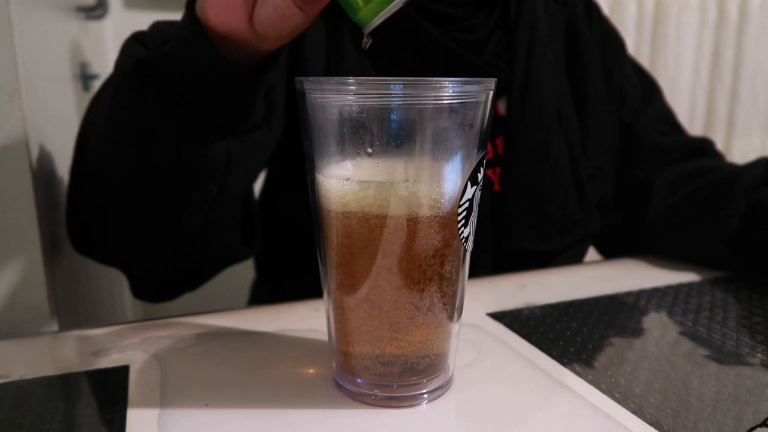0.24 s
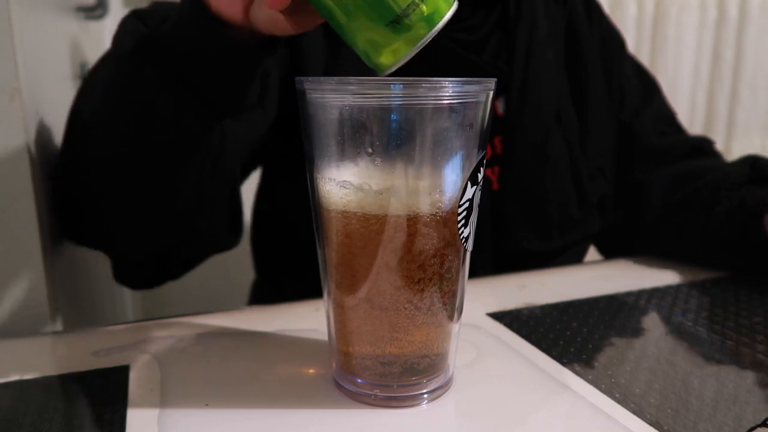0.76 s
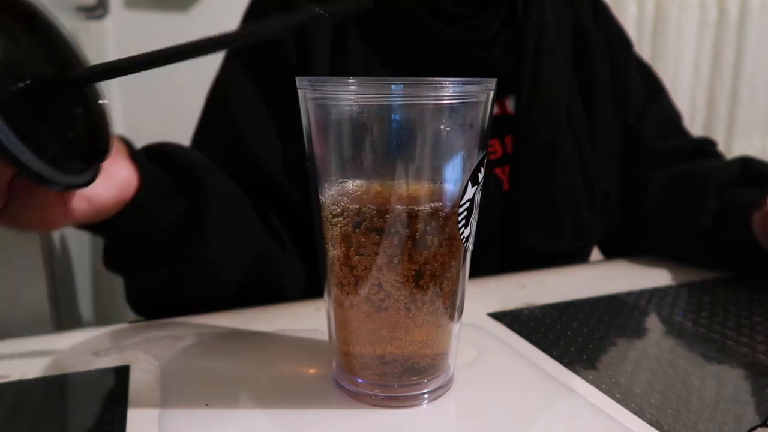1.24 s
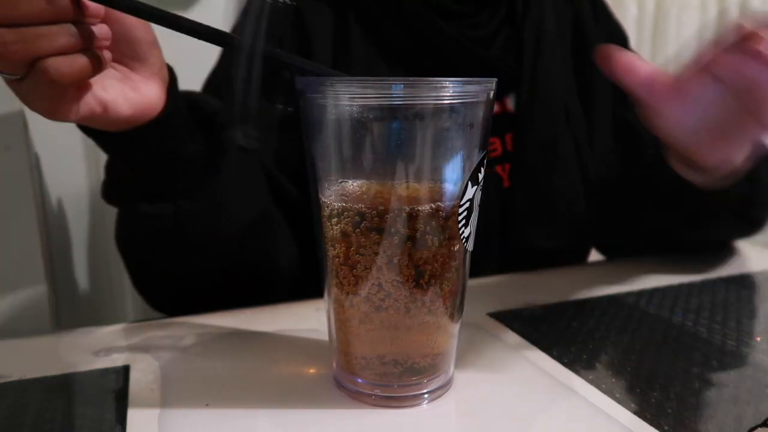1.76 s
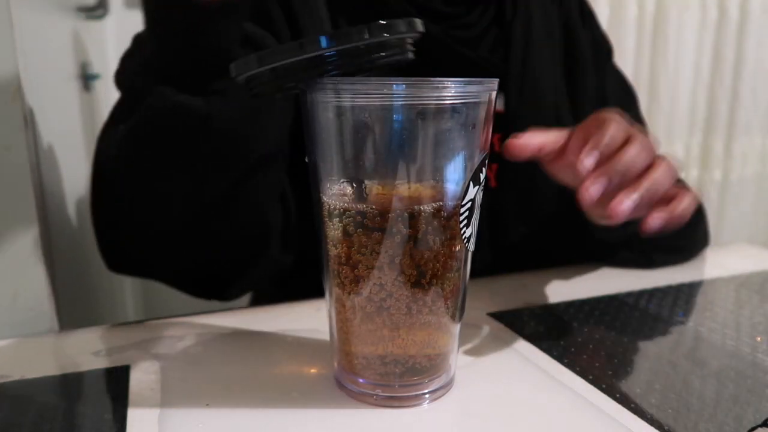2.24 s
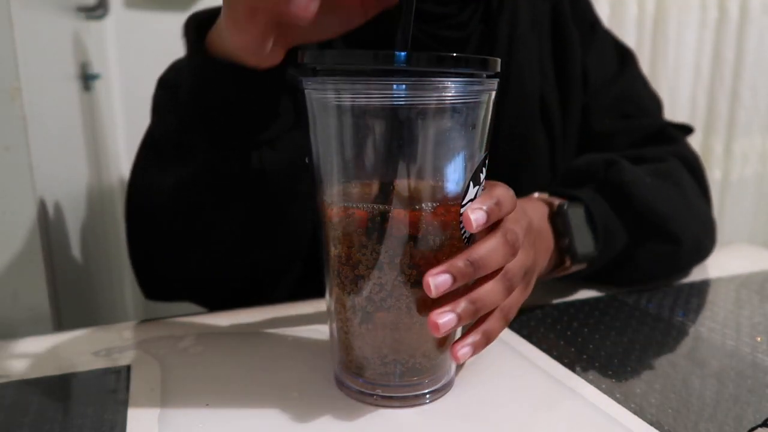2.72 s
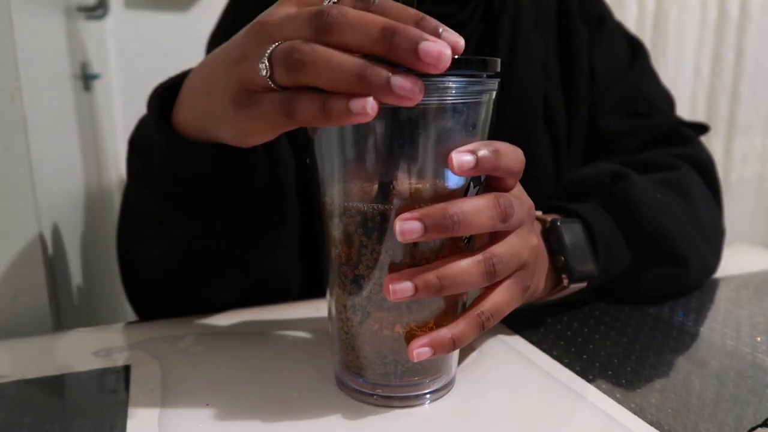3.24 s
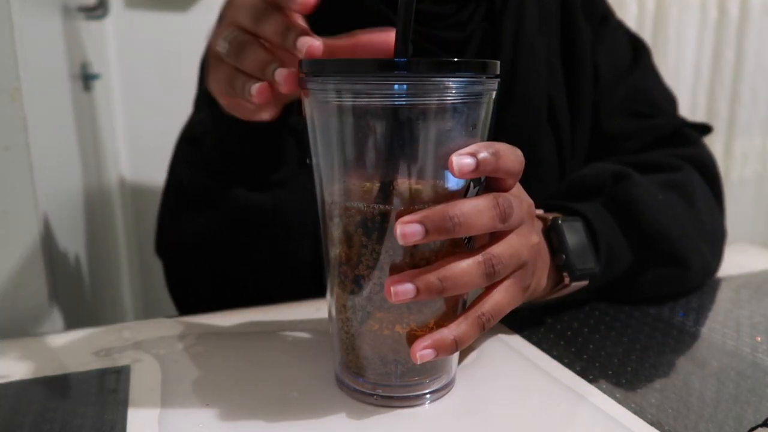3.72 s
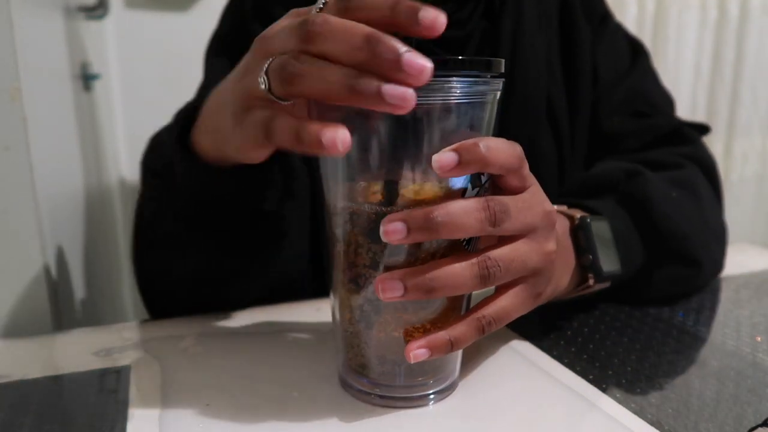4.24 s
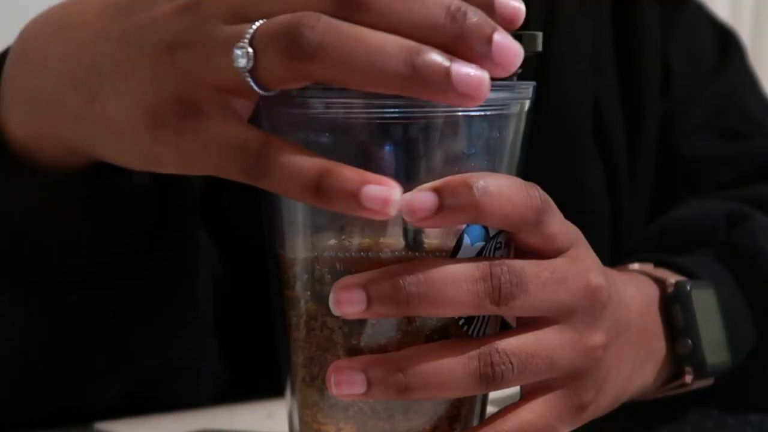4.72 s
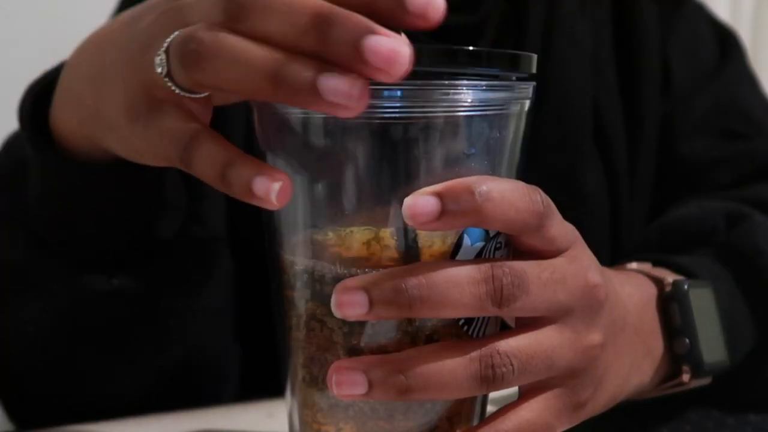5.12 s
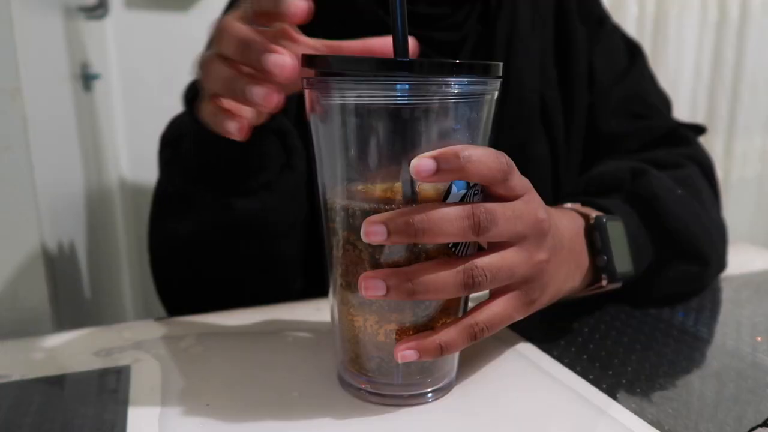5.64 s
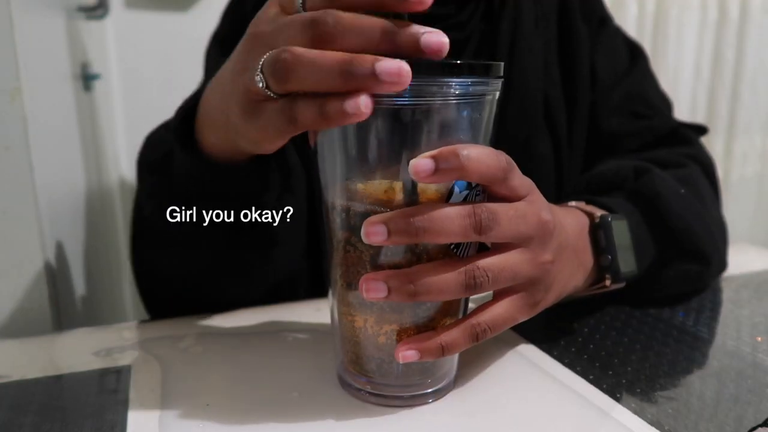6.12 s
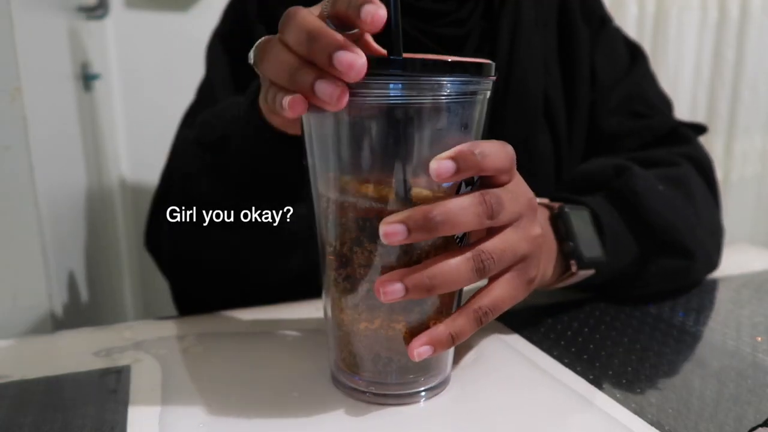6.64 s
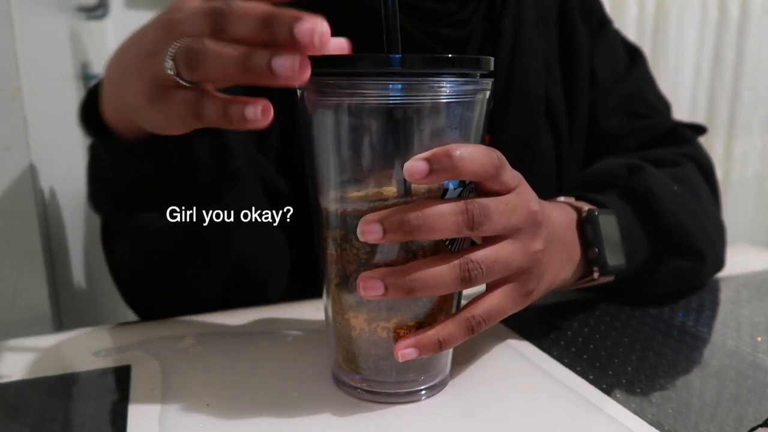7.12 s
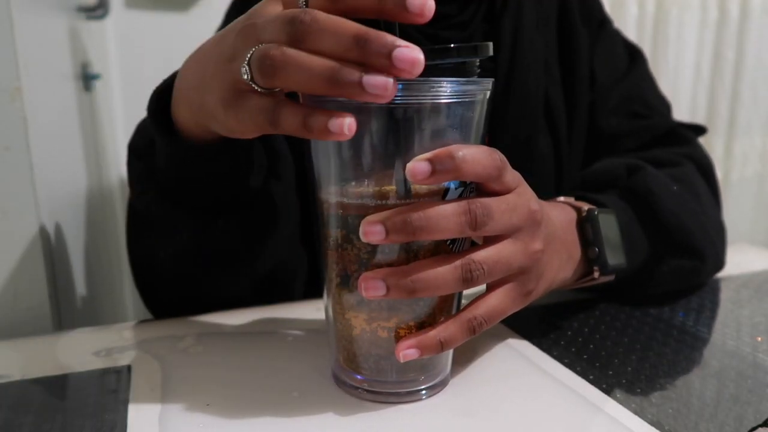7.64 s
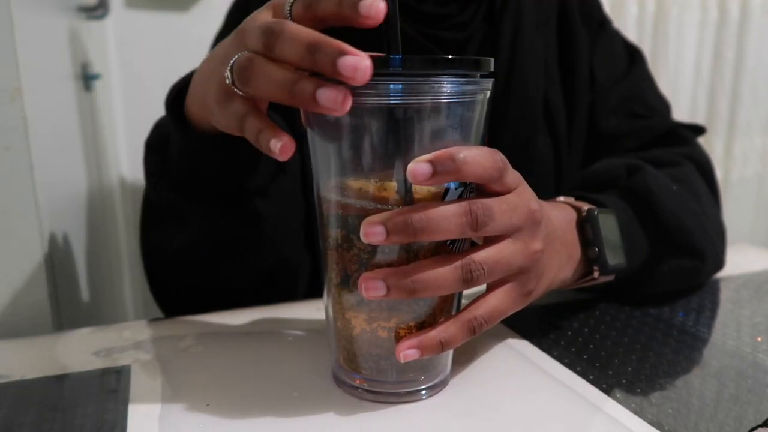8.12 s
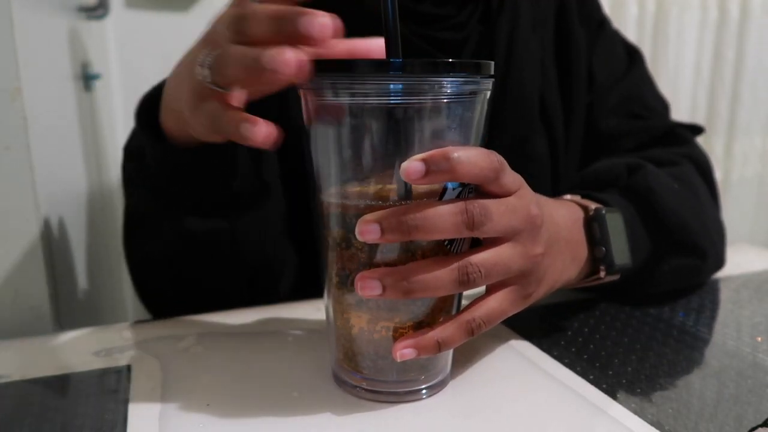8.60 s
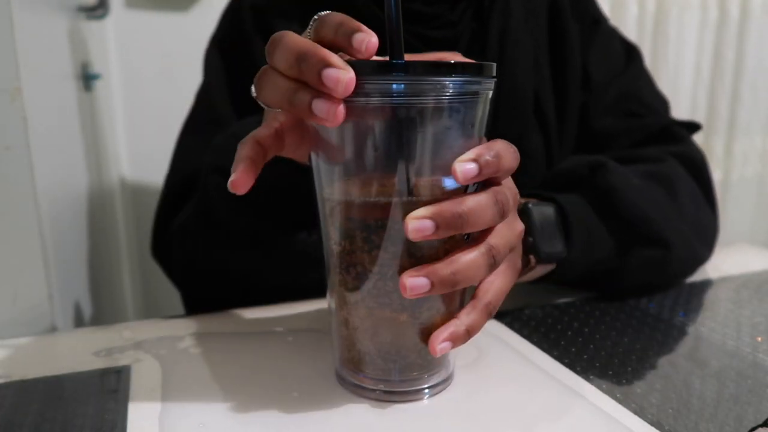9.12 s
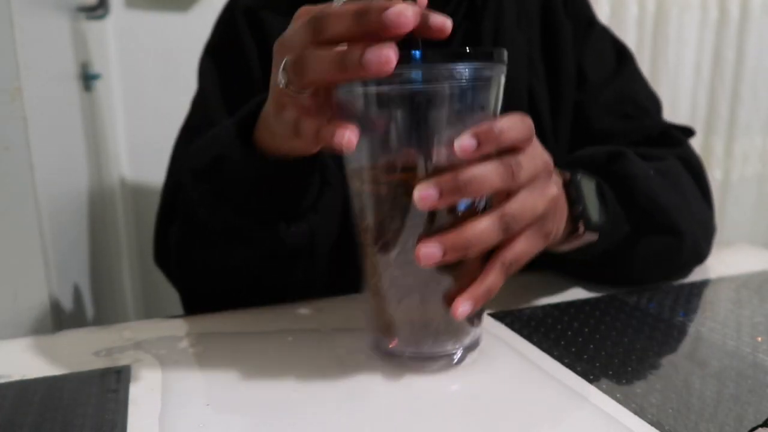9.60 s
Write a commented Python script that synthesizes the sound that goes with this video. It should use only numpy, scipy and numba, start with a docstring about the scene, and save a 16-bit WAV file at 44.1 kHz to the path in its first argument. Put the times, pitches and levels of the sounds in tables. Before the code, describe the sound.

Steady soft bubbling from a fizzy drink ends in a sudden cut. A hard lid snaps against a plastic cup, the straw rattles, and hands twist and rub the lid in uneven bursts. Sharp hollow knocks alternate with near-silent gaps, joined later by low thuds of the base on the table. Close, dry microphone, small indoor space, low hum and hiss throughout.

```python
"""Fizzing tumbler, then its lid and straw

A soft drink fizzes and gurgles in a plastic tumbler: bursting bubbles drive air modes; at 1.241 s this stops abruptly.
A lid with a straw then knocks the rim and is turned on its thread with rubs and clicks; the tumbler bumps
and slides on a table: blows and stick-slip grit ring modes of table, wall, straw, air column and lid.
Close pickup in a small room; low hum, hiss and a faint throbbing whine run throughout."""
import sys
import numpy as np
from scipy import signal
from scipy.fft import rfft, irfft, next_fast_len
from scipy.io import wavfile
from scipy.ndimage import uniform_filter1d
from numba import njit

SR = 44100
rng = np.random.default_rng(int(sys.argv[2]) if len(sys.argv) > 2 else 0)


def transcribe(u):
    """Save the signal u as a 16-bit wav file named by the first command-line argument.

    u: samples, shape (n,) or (channels, n), limited to [-1, 1]; the rate is SR.
    q: integer samples, one column per channel.
    """
    v = np.clip(np.atleast_2d(u).T, -1, 1)
    q = np.round(v * 32767).astype(np.int16)
    wavfile.write(sys.argv[1], SR, q)


N = 435260
HOP = 128  # samples per step of the slow controls

# spectrum of foam: f/Hz, density/dB per Hz
FIZZ_SPECTRUM = [(400, -13), (740, -40), (850, -5.5), (1170, -3.5), (1550, -4), (1950, -5), (2900, -4),
                 (4300, -10), (5200, -17), (7500, -26.5), (10000, -26), (11000, -58), (13000, -21),
                 (15400, -45)]
# air modes above the foam: f/Hz, level/dB, t60/s
FOAM_AIR_MODES = [(866, -8.5, 0.062), (977, -9.5, .05), (1340, -4, 0.04), (1787, -4.5, .04)]
# last trickle in the air above the drink: t/s, level/dB before GURGLE_TRIM_DB, f/Hz
GURGLE_TRACK = [(0, -48, 1200), (.14, -60, 1195), (.23, -48, 1150), (.3, -59, 1165), (.4, -49, 1190),
                (.68, -51.5, 1145), (.92, -51.5, 1130), (.97, -58.5, 1140), (1.24, -53, 1145)]
CUT_S, FIZZ_DB = 1.241, -45.5
GURGLE_T60_S, GURGLE_WANDER, GURGLE_TRIM_DB = .055, .01, 0.5  # wander as a fraction of pitch

# spectrum of hum: f/Hz, density/dB per Hz
HUM_SPECTRUM = [(20, -24.5), (33, -25), (48, -9.5), (62, -17.5), (78, -15.5), (94, 0.5), (108, -13),
                (142, -8.5), (160, -16), (180, -12.5), (230, -23.5), (400, -27), (800, -60)]
# spectrum of hiss: f/Hz, density/dB per Hz
HISS_SPECTRUM = [(60, -10), (200, 5.5), (400, 3.5), (700, -2), (1600, -7), (3000, -12.5), (6000, -19),
                 (9000, -23.5), (11000, -23), (13000, -28.5), (14000, -34), (15500, -45)]
HUM_DB, HISS_DB = -48, -52
WHINE_HZ, WHINE_DB, THROB_HZ = 13001, -74, 24.3

# modes of the table top: f/Hz, level/dB, t60/s before damping
TABLE_MODES = [(57, -8.5, 0.15), (100, 0, 0.23), (121, 0, 0.13), (179.6, 3.5, 0.2), (206.3, -10, 0.2)]
# modes of the tumbler wall: f/Hz, level/dB, t60/s
WALL_MODES = [(285.2, -2, 0.42), (329, 3.5, 0.038), (440, -8, 0.14), (486, -0.5, 0.069), (535, 0, 0.036),
              (668.4, 5, 0.029), (733, 5, 0.034), (854, 3.5, 0.056), (971, 9, 0.076)]
# modes of the straw: f/Hz, level/dB, t60/s
STRAW_MODES = [(1126, -4.5, .03), (1212, -6, 0.094), (1259, 3, 0.046), (1316, 1.5, 0.036)]
# modes of the air column: f/Hz, level/dB, t60/s
AIR_MODES = [(1492, 0, 0.09), (1540, -14, 0.06)]
# modes of the lid: f/Hz, level/dB, t60/s before damping
LID_MODES = [(1836, -6, .03), (2010, -9, .025), (2180, 3, .035), (2300, -4, .03), (2390, 0, .05),
             (2480, -3, .035), (2650, -5, .05), (2725, 1, .075), (2960, -9, .03), (3125, 2, .035),
             (3390, -10, .03), (3660, -7, .04), (3800, -16, .02)]
# modes of the high tick: f/Hz, level/dB, t60/s before damping
TICK_MODES = [(4077, -2, 0.025), (4300, -4.5, 0.0088), (4820, 1, 0.032), (5170, -8, 0.0099),
              (5930, -7.5, 0.013), (6730, -12.5, .01), (6920, -4, 0.016), (8800, -16, .008),
              (13000, -9.5, .006)]
# edges between the bands of table, wall, straw, air column, lid, tick: f/Hz
BAND_EDGES_HZ = [60, 250, 1000, 1400, 1650, 4000, 12500]

# blows on lid and tumbler: t/s, wall/dB, straw/dB, air column/dB, lid/dB, tick/dB, wall f/Hz, lid f/Hz, contact/ms
KNOCK_EVENTS = [(1.425, -31.5, -36, -40, -21, -39, 700, 1950, 1.5),
                (1.427, -31.5, -44, -28, -23.5, -40, 480, 2680, 1.3),
                (1.428, -34.5, -41, -45, -22, -46, 322.4, 3640, 2.0),
                (1.873, -8, -12, -14, 6, -19, 570, 2160, 3.7),
                (1.901, -24, -38, -17.5, -36.0, -55, 413, 2210, 11.0),
                (1.938, -38, -23, -13, -5.5, -18.5, 520, 2440, 1.4),
                (2.004, -27.5, -30, -26, -3, -45, 340, 2170, 0.21),
                (2.112, -30, -27.5, -30, -28, -47, 342, 2720, 1.2),
                (2.146, -30, -40, -47, -29, -60, 340, 1920, 3),
                (2.169, -25, -17, -22, -28, -44, 400, 2560, 5.1),
                (2.178, -24.5, -29, -11.5, -25.5, -37.5, 454, 1850, 7.1),
                (2.209, -23.5, -33, -32, -25, -59, 342, 1810, 5),
                (2.235, -27, -22, -30, -32, -52, 401, 2710, 1.1),
                (2.367, -53, -55.0, -54, -42, -63, 420, 2650, 1.6),
                (2.402, -19.5, -43.5, -16, -55, -64, 900, 1850, 8.4),
                (2.434, -22, -16, -27, -20.5, -52, 705, 2480, 2.9),
                (2.45, -21, -22, -17.5, -45, -54.5, 680, 2370, 1),
                (2.481, -15.5, -19, -18, -23, -56, 680, 1850, 12.0),
                (2.496, -11, -20, -20, -13, -36, 530, 1850, 1.4),
                (2.514, -10, -8, -32, -9, -24.5, 550, 2290, 0.82),
                (2.533, -6, -11, -27, -10.5, -21, 440, 2480, 1.55),
                (2.546, -15, -26, -7, -13, -25, 450, 3140, 2.4),
                (2.591, -13, -17, -30, -21, -34, 380, 2280, 1.7),
                (2.748, -18.5, -22, -19.5, -15, -33, 456, 1860, 0.75),
                (2.819, -17, -17, -39, -13, -34.5, 670, 2400, 2.6),
                (2.877, -23, -19, -30, -21.0, -39, 700, 2430, 0.41),
                (2.891, -20, -23, -13, -10, -23.5, 530, 2250, 1.4),
                (3.048, -40.0, -28, -28.5, -25.5, -57, 688, 2840, 0.96),
                (3.113, -57, -57, -55, -42, -45, 420, 3300, 1),
                (3.227, -29, -37, -26, -31, -49, 440, 2130, 7.9),
                (3.236, -14, -11.5, -14, -17.5, -39.5, 664, 2300, 0.49),
                (3.252, -16.5, -27, -28, -16.5, -41, 529, 1850, 0.74),
                (4.076, -28, -36.5, -48, -33.5, -45, 420, 3050, 3.8),
                (4.13, -32.5, -39, -54.0, -40, -54, 474, 2340, 1.9),
                (4.522, -34.0, -37, -47, -29, -42, 530, 2010, 0.87),
                (4.554, -55, -48, -61, -32, -48.5, 420, 2980, 1.1),
                (4.563, -26.5, -28.5, -53, -33, -41, 474, 2570, 7.3),
                (4.661, -23.5, -30, -21, -26.5, -43.5, 800, 2510, 5.1),
                (4.682, -6, -14, -31, -11, -23, 470, 2350, 1.86),
                (4.738, -12.5, -23.5, -31, -18, -42, 483, 2100, 0.58),
                (4.776, -4, -7, -9, -4.5, -22, 565, 2330, 1.28),
                (4.862, -11.5, -36, -16.5, -43, -58.0, 486, 1850, 11),
                (4.883, -9.5, -20, -17, -20, -36.5, 516, 2360, 3.8),
                (4.9, -8.5, -31, -21, -13, -40, 533, 2380, 2.7),
                (4.908, -9.5, -9, -35.0, -9, -25.5, 490, 2380, 2.6),
                (4.989, -21, -23, -50, -31, -48.5, 440, 2350, 2.3),
                (5.017, -30, -28, -39, -30, -42, 425, 2580, 6.2),
                (5.039, -25, -31, -31, -31.5, -42, 375, 2730, 1.7),
                (5.079, -20.5, -30, -38, -28, -53, 310, 2300, 1.7),
                (5.386, -32.5, -37.5, -58.5, -57, -72, 448, 3180, 1.8),
                (5.444, -26.5, -37.5, -40.5, -37, -44.5, 398, 2700, 7.7),
                (5.863, -28.5, -31.5, -35, -24.5, -30.5, 626, 2110, 0.94),
                (6.205, -54.0, -42, -51.5, -37, -61.5, 317, 2710, 0.92),
                (6.236, -56, -43, -50, -35, -60, 330, 1850, 1.1),
                (6.289, -34, -31.5, -40, -40, -44, 483, 2640, 1.7),
                (6.298, -50, -54, -55.0, -37, -53, 420, 2720, 1.2),
                (6.365, -43, -42, -45, -34, -50, 262, 2690, 2.3),
                (6.4, -59.0, -56.0, -46.5, -40, -63.0, 330, 1850, 1.3),
                (6.421, -55, -57, -57, -38.5, -58, 420, 2720, 1.5),
                (6.431, -33, -40, -59, -41, -59, 280, 2720, 2.5),
                (6.471, -52, -55.0, -55.0, -41, -60.5, 420, 2210, 1.2),
                (6.494, -57, -59, -44, -52, -65, 410, 3130, 1.1),
                (6.517, -30.5, -33, -38, -28, -36.5, 280, 2840, 2.5),
                (6.592, -9, -25.5, -30, -23.5, -48, 465, 1850, 2.2),
                (6.6, -47, -33, -47, -21, -60, 400, 2730, 1.1),
                (6.617, -56, -55.0, -56, -29.5, -48, 420, 3300, 2.1),
                (6.661, -34, -23, -30, -25.5, -35, 330, 2410, 1.4),
                (6.685, -24, -38, -53.0, -32, -51, 375, 3780, 1.4),
                (6.743, -17, -17, -31, -21, -41, 604, 2240, 2.3),
                (6.88, -22.5, -31, -34, -29, -43, 490, 2510, 1.9),
                (6.977, -30.5, -49, -42, -34, -51, 350, 2730, 1.6),
                (7.079, -52, -56, -55, -30, -49, 420, 2230, 1.2),
                (7.149, -25, -45, -23.5, -37, -57, 610, 2010, 14),
                (7.17, -24.5, -13, -15, -19.5, -39, 410, 1850, 4.6),
                (7.194, -23, -39, -14, -23, -49, 657, 1850, 7.6),
                (7.209, -16, -30, -37.5, -42, -54, 665, 1850, 1.2),
                (7.316, -54, -47, -53, -39.5, -57, 402, 3000, 1.5),
                (7.437, -47.5, -52.0, -57, -42.5, -53.5, 400, 2720, 1.4),
                (7.533, -47.5, -52, -54.5, -45, -60.5, 399, 2390, 1.1),
                (7.64, -22.5, -25.5, -30.5, -23, -34, 502, 3110, 2.2),
                (7.651, -12.5, -24, -43, -27.5, -39, 504, 2190, 2.8),
                (7.741, -27.5, -52, -47.0, -57, -75, 470, 2080, 5.9),
                (7.855, -29, -36, -37, -32, -47, 375, 1850, 2.1),
                (8.02, -26.5, -29, -35.5, -39, -51, 414, 2100, 1.3),
                (8.311, -35.5, -31, -33.5, -40, -54, 797, 3750, 3.6),
                (8.445, -18.5, -17.5, -24.5, -23.5, -47, 453, 2680, 2.8),
                (8.651, -25.5, -34.5, -42.5, -28, -40, 533, 3070, 1.04),
                (8.768, -26.5, -33, -52.5, -30, -37, 660, 3410, 1.7),
                (8.802, -55.0, -55.0, -57, -44.5, -58.5, 417, 2700, 1.2),
                (8.83, -29, -47, -49, -38.0, -51.0, 484, 2540, 1.7),
                (8.87, -54.0, -47.0, -34, -31.5, -58.0, 372, 2700, 1.7),
                (9.037, -41, -36.5, -45, -29, -41, 360, 2930, 0.68),
                (9.11, -22, -27, -38, -25, -42, 410, 1850, 0.9),
                (9.162, -55.5, -51.5, -55.5, -33.5, -48, 420, 2640, 1.2),
                (9.178, -56, -55.0, -54, -22.5, -43.5, 420, 2730, 1.4),
                (9.187, -21, -26, -30, -20, -47, 428, 1850, 0.6),
                (9.275, -21.5, -16.5, -29.5, -19.5, -30.5, 730, 3630, 2.1),
                (9.305, -34.0, -37, -47.5, -26, -54, 370, 1940, 1.34),
                (9.483, -43, -40.5, -41.5, -37, -44.5, 408, 3210, 1.7),
                (9.518, -25.5, -27.5, -38.5, -29, -39, 884, 3750, 6.4),
                (9.577, -43, -52, -54, -34, -53, 410, 2260, 0.77),
                (9.64, -55, -48, -65.0, -36, -70, 313, 2510, 0.48),
                (9.664, -54, -41, -53, -35, -66, 430, 2750, 1.3),
                (9.75, -51, -42, -42.5, -27.5, -71, 470, 2660, 2.4),
                (9.835, -31.5, -36, -43, -34, -55, 790, 2410, 0.71)]
# in wall, straw, air column, lid, tick: spread of mode pitch (fraction); share of crack
DETUNE = 0.0068, 0.015, 0.0035, 0.0093, 0.02
CRACK = 0.99, .45, .05, 0.51, 0.46
IMPACT = 2.35  # weight of the hard first impact
CLEAN_DB_PER_DB = 0.1  # soft blows land once and hardly chatter
CRACK_DB_PER_DB = 1  # soft blows crack less for their size and ring more purely
DULL_DB = -22  # a tick further under the lid than this weakens the crack by the excess
WALL_FOCUS_DB_PER_OCT = 28.
LID_FOCUS_DB_PER_OCT, LID_FOCUS_PER_DB = 22, 0.9  # base; soft blows ring fewer lid modes
PURE_PER_DB = .15  # the duller a soft blow, the more one lid mode sounds alone
HARD_DAMP_DB_PER_DB, HARD_DAMP_FROM_DB = .15, -33.5  # hard blows choke lid and tick sooner

# strokes of hand, thread or base: peak t/s, rise/s, fall/s, wall/dB, air column/dB, lid/dB, skin/dB, wall f/Hz, lid f/Hz
STROKE_EVENTS = [(1.5, 0.054, 0.067, -57.5, -53, -62, -62, 402, 2600),
                 (1.631, .08, .1, -74, -52, -52.5, -80, 400, 2174),
                 (1.715, .1, .06, -77, -46.5, -46, -68.5, 398.3, 2726),
                 (1.76, .06, 0.5, -76, -42.5, -42, -64, 398.7, 2730),
                 (1.785, .07, .08, -76, -60.5, -42, -60.5, 400, 3660),
                 (1.851, 0.078, 0.11, -69, -53, -38, -57, 556.3, 3500),
                 (1.92, 0.043, 0.081, -36.5, -46, -30, -42.5, 503.6, 2221),
                 (2.05, .06, 0.26, -56, -56.5, -45.5, -76, 365, 2277),
                 (2.211, 0.062, 0.069, -39.5, -47, -47, -70, 683.5, 1900),
                 (2.28, 0.073, .12, -46, -49, -58, -90, 930, 2700),
                 (2.34, 0.046, 0.1, -53, -40, -66, -92, 930, 2500),
                 (2.37, 0.043, 0.06, -38.5, -55, -62, -92, 283, 2700),
                 (2.42, .05, 0.094, -41, -28.5, -57, -76, 800, 2300),
                 (2.53, 0.13, 0.14, -24, -28, -32.5, -50, 450.4, 2400),
                 (2.66, .06, 0.13, -39.5, -53, -48.5, -64, 302.5, 2400),
                 (2.91, 0.12, 0.086, -38.5, -47, -46.5, -62, 625, 2320),
                 (3.07, 0.22, 0.22, -46.5, -57.5, -53.5, -65, 330, 2647),
                 (3.56, 0.28, 0.23, -50.5, -57, -49, -56.5, 399, 2500),
                 (3.7, 0.18, 0.065, -49, -45.5, -48.5, -50.5, 451, 2600),
                 (4.21, 0.13, 0.31, -46.5, -51, -47, -58.5, 428, 2877),
                 (4.32, 0.17, 0.22, -50, -63, -53, -57, 426, 2800),
                 (4.48, 0.082, 0.14, -57, -63, -52.5, -62, 426, 2718),
                 (4.58, 0.11, 0.042, -41.5, -72, -54, -58, 351, 2430),
                 (4.722, 0.041, 0.1, -38, -45, -45, -53, 479.6, 2390),
                 (4.9, 0.16, 0.25, -35.5, -41.5, -44.5, -58, 479, 2360),
                 (5.32, 0.087, 0.16, -50.5, -51, -56, -58.5, 489, 2333),
                 (5.47, 0.056, 0.073, -37.5, -44, -49, -53.5, 300, 2566),
                 (6.3, 0.49, 0.5, -50, -70, -59.5, -77, 317, 2650),
                 (6.81, 0.1, 0.15, -43.5, -62, -46.5, -55.5, 450.5, 2880),
                 (6.9, 0.12, 0.14, -42.5, -63, -47.5, -56, 451, 3077),
                 (6.66, .05, 0.063, -44, -63, -51.5, -56, 470, 2674),
                 (7.039, 0.077, 0.15, -41, -52, -47.5, -51.5, 353, 2466),
                 (7.19, 0.037, 0.063, -28.5, -36, -36.5, -59, 544, 2134),
                 (7.33, .15, 0.19, -47.5, -49.5, -60.5, -75, 402, 2697),
                 (7.69, .04, 0.078, -43.5, -57, -59, -68, 480, 2513),
                 (8.26, 0.3, 0.17, -51, -47.5, -51.5, -59, 562, 2925),
                 (8.36, 0.21, 0.22, -55, -56, -51.5, -52, 450, 2610),
                 (8.459, 0.064, 0.054, -40, -43, -47, -43, 450, 2502),
                 (8.845, .04, .09, -44.5, -65, -46.5, -58, 404.4, 2682),
                 (8.94, .07, 0.086, -45.5, -46, -44, -57, 601.5, 2500),
                 (9.03, 0.12, 0.076, -41, -43.5, -37, -47.5, 501, 2840),
                 (9.11, 0.038, 0.052, -35.5, -55, -45.5, -52, 450, 2676),
                 (9.19, 0.13, 0.11, -31, -54, -48.5, -55.5, 290, 2500),
                 (9.559, .04, 0.087, -52, -67, -53, -60, 550.5, 2500),
                 (9.68, .04, 0.1, -61.5, -53, -53.5, -81, 338, 2706),
                 (9.77, .02, 0.075, -67, -76, -56, -79, 340, 2650),
                 (9.84, .08, 0.11, -65.5, -74, -52, -79, 549, 2396)]
# spectrum of skin: f/Hz, density/dB per Hz
SKIN_SPECTRUM = [(1500, -26.5), (2200, -10), (3000, 4), (3800, -9.5), (4700, -9.5), (5800, -7),
                 (7500, -13.5), (9000, -15), (11000, -22), (13000, -18.5), (14500, -22.5), (15500, -25)]
STROKE_SLOPE_DB = 17  # drop one rise before and one fall after the peak
WANDER_OCT = 0.066  # the place rubbed wanders round the pitch of the stroke
RUB_TABLE_DB, RUB_STRAW_DB, RUB_TICK_DB = -2, -2.5, -12  # against wall; mean of wall, lid; mean of lid, skin
# in table, wall, straw, air column, lid, tick: share of bare grit; t60 factor; longest t60/s; focus/dB per octave
RUB_BROAD = 0.3, 0.3, 0.6, 0.3, 0.55, .7
RUB_LINGER = .7, 1.3, .9, 1, 1, 1
RUB_T60_MAX_S = .25, .2, .06, .07, .05, .03
RUB_FOCUS_DB_PER_OCT = 0, 22., 0, 0, 32., 0
SEATED_S, LOOSE_BROAD, SEATED_BROAD = 2.75, .3, 1.2  # lid on the rim from here; grit share factors before, after
# rattle of loose parts against the blow, in table, wall, straw, air column, lid, tick-driven skin
RATTLE_DB, RATTLE_FADE_DB_PER_S = (-15, -19, -24.5, -18.5, -27.5, -21), 188.5

# bumps of hand and base on the table: t/s, peak/dB, f/Hz
BUMP_EVENTS = [(1.87, -14.5, 133.3), (2.004, -29, 110), (2.174, -28.5, 121), (2.23, -32, 229),
               (2.431, -28.5, 191), (2.551, -35.5, 120), (2.581, -22, 190), (3.117, -23, 119),
               (3.233, -15.5, 111), (3.298, -23.5, 164), (4.092, -36, 169), (4.245, -22.5, 121),
               (4.286, -38, 161), (4.586, -25, 199), (4.678, -15.5, 141), (4.771, -23.5, 200),
               (4.903, -35, 170), (5.075, -30.5, 200), (5.441, -46, 179.6), (5.883, -36, 180),
               (6.178, -23, 99), (6.295, -21.5, 100), (6.366, -21.5, 120), (6.466, -26, 150),
               (6.521, -25, 220), (6.589, -1, 153), (6.617, -24.5, 169), (6.653, -15.5, 180),
               (6.733, -10, 137), (6.801, -23, 160), (6.881, -18, 119), (6.976, -29, 120),
               (7.146, -26, 139.4), (7.195, -34, 110), (7.239, -25, 161), (7.649, -31.5, 200),
               (8.44, -26, 202.6), (8.489, -30.5, 180), (8.888, -18, 114), (9.032, -19.5, 161),
               (9.083, -21.5, 158), (9.124, -19, 100), (9.152, -16, 80), (9.172, -12, 98),
               (9.218, -18, 181), (9.28, -23.5, 173), (9.33, -28, 180), (9.537, -20, 116),
               (9.689, -34, 121)]
BUMP_DAMPING, BUMP_RISE_S = 0.15 / 0.14, 0.0021
BUMP_PRESS_DB = -6.5  # harder bumps press on the table and stop it sooner

ROOM_T60_S, ROOM_DAMP, ROOM_DB = 0.67, 0.8, -17.5  # t60 before the treble damping
# stereo width: f/Hz, side to mid/dB
WIDTH_CURVE = [(20, -29.5), (150, -50), (400, -23.5), (1300, -25.5), (2400, -31), (4400, -10.5), (8000, 3),
               (16000, 7.5)]
# capsule response, notched by its housing: f/Hz, level/dB
MIC_CURVE = [(10, -2.5), (8500, 0), (11000, -7), (12600, -3.5), (22050, -7)]
TOP_HZ = 15600


def undb(db):
    """Decibels to gain."""
    return 10 ** (np.asarray(db) / 20)


def unit(x):
    """Scale to rms 1."""
    return x / np.sqrt(np.mean(x ** 2))


def shape(x, points):
    """Filter by (Hz, dB) points, straight in log frequency."""
    hz, db = np.transpose(points)
    size = next_fast_len(N)
    f = np.maximum(np.arange(size // 2 + 1) * SR / size, 1)
    gain = undb(np.interp(np.log(f), np.log(hz), db, -120, -120))
    return irfft(rfft(x, size) * gain, size)[..., :N]


def colour(x, points):
    """Filter by (Hz, dB) points; rms 1."""
    return unit(shape(x, points))


def walk(rate_hz):
    """Random levels held 1 / rate_hz and smoothed twice; spread near 1."""
    hold = int(SR / rate_hz)
    steps = np.repeat(rng.standard_normal(N // hold + 1), hold)
    return 1.6 * uniform_filter1d(uniform_filter1d(steps, hold), hold)[:N]


def grit(rate_hz, spread_db):
    """Random clicks, a few much larger than the rest; rms 1."""
    hit = rng.random(N) < rate_hz / SR
    return unit(hit * rng.standard_normal(N) * undb(spread_db * rng.exponential(size=N)))


def resonate(x, hz, t60):
    """One mode driven by a continuous force; a unit click gives a peak near 1."""
    r, w = np.exp(-np.log(1000) / (t60 * SR)), 2 * np.pi * hz / SR
    return signal.lfilter([np.sin(w)], [1, -2 * r * np.cos(w), r * r], x)


def band(x, part, spill=1.075):
    """The frequency range of one part."""
    edges = BAND_EDGES_HZ[part] / spill, BAND_EDGES_HZ[part + 1] * spill
    return signal.sosfilt(signal.butter(3, edges, "band", fs=SR, output="sos"), x)


def add(out, s, sound):
    """Mix a sound in at time s."""
    i = int(s * SR)
    out[i:i + len(sound)] += sound[:N - i]


def ring(modes, damping, chance, pitch_hz, scatter_db, detune, focus_db):
    """One blow: the place struck favours modes near a pitch; each gets its own share and tuning; peak 1."""
    hz, db, t60 = np.transpose(modes)[:, :, None]
    if pitch_hz:
        db = db - focus_db * np.abs(np.log2(hz / pitch_hz))
    t = np.arange(int(t60.max() / damping * SR) + 1) / SR
    share, shift = chance[:len(modes), None], chance[-len(modes):, None]
    decay = undb(db + scatter_db * share - 60 * damping * t / t60)
    y = np.sum(decay * np.sin(2 * np.pi * hz * (1 + detune * shift) * t), 0)
    return y / np.abs(y).max()


def fizz():
    """Thousands of tiny bubbles a second burst in foam and ring the air above, each mode coming and going."""
    t = np.arange(N) / SR
    pops = grit(7000, 1.6) + 0.79 * rng.standard_normal(N)
    air = sum(undb(db + 2.8 * walk(5.7)) * resonate(pops, hz, t60) for hz, db, t60 in FOAM_AIR_MODES)
    level = undb(FIZZ_DB + 0.49 * walk(29.6))
    foam = level * (colour(pops, FIZZ_SPECTRUM) + 0.34 * unit(air))
    return (foam + gurgle(t)) * np.clip((CUT_S - t) / 0.0014, 0, 1)


def gurgle(t):
    """Scattered larger bubbles ring one narrow resonance whose pitch wanders."""
    s, db, hz = np.transpose(GURGLE_TRACK)
    pitch_hz = np.interp(t, s, hz) * (1 + GURGLE_WANDER * walk(11.7))
    turn = np.exp(2j * np.pi * np.cumsum(pitch_hz) / SR)
    fade = np.exp(-np.log(1000) / (GURGLE_T60_S * SR))
    # the resonance is fixed in a frame that turns with the pitch
    rung = np.real(signal.lfilter([1], [1, -fade], grit(2000, 1.5) / turn) * turn)
    return unit(rung) * undb(np.interp(t, s, db) + GURGLE_TRIM_DB)


def background():
    """Wavering low hum, same on both sides; separate hiss in each capsule; thin amplitude-modulated whine."""
    t = np.arange(N) / SR
    hum = colour(rng.standard_normal(N), HUM_SPECTRUM) * undb(HUM_DB + 0.5 * walk(5.7))
    hiss = undb(HISS_DB) * colour(rng.standard_normal((2, N)), HISS_SPECTRUM)
    throb = 1 + .7 * np.sin(2 * np.pi * THROB_HZ * t)
    whine = undb(WHINE_DB) * throb * np.sin(2 * np.pi * WHINE_HZ * t)
    return hum + hiss + whine


def parts_struck():
    """Nominal peak dB of each knock in wall, straw, air column, lid and tick."""
    return np.transpose(KNOCK_EVENTS)[1:6]


def knocks():
    """Each blow lands, chatters for a time set by its contact, rings every part and cracks."""
    parts = np.zeros((5, N))
    chance = rng.standard_normal((len(KNOCK_EVENTS), 5, 26))
    noise = rng.standard_normal((len(KNOCK_EVENTS), 1500))
    for (s, *_, wall_hz, lid_hz, ms), dbs, luck, hiss in zip(KNOCK_EVENTS, parts_struck().T, chance, noise):
        lid_db, tick_db = dbs[3:]
        size = int(np.clip(ms, .2, 10) * SR / 1000 * 3)
        x = np.arange(size) / size
        contact = hiss[:size] * np.exp(-(x * 2) ** 2)
        # brief contacts start with one hard impact
        contact[0] += IMPACT * np.sqrt(size / 20) / ms * undb(-CLEAN_DB_PER_DB * dbs.max())

        dull_db = max(DULL_DB - tick_db + lid_db, 0)
        crack = undb(CRACK_DB_PER_DB * dbs.max() - dull_db) * hiss[-size:] * np.exp(-x * 3)
        purity = LID_FOCUS_PER_DB * min(lid_db, -8) * (1 + PURE_PER_DB * dull_db)
        focus = WALL_FOCUS_DB_PER_OCT, 0, 0, LID_FOCUS_DB_PER_OCT - purity, 0
        pitches = wall_hz, None, None, lid_hz, None
        # fingers damp lid and tick most
        choke = 1.5 * undb(HARD_DAMP_DB_PER_DB * max(lid_db - HARD_DAMP_FROM_DB, 0))
        dampings = 1, 1, 1, choke, choke
        for part, modes in enumerate((WALL_MODES, STRAW_MODES, AIR_MODES, LID_MODES, TICK_MODES)):
            rung = ring(modes, dampings[part], luck[part], pitches[part],
                        scatter_db=3.5, detune=DETUNE[part], focus_db=focus[part])
            y = signal.fftconvolve(rung, contact)
            y /= np.abs(y).max()
            y[:size] += CRACK[part] * crack
            add(parts[part], s, undb(dbs[part]) * y)
    return sum(band(x, part + 1, spill=1.3) for part, x in enumerate(parts))


def strokes(t):
    """dB by which each stroke lies under its peak."""
    s, rise, fall = np.transpose(STROKE_EVENTS)[:3, :, None]
    return STROKE_SLOPE_DB * np.maximum((s - t) / np.maximum(rise, .01), (t - s) / np.maximum(fall, .01))


def pressure(t):
    """Friction gain in table, wall, straw, air column, lid, skin: strokes swell and fade, blows rattle on."""
    wall, air, lid, skin = np.transpose(STROKE_EVENTS)[3:7, :, None]
    away = strokes(t)
    peaks = wall + RUB_TABLE_DB, wall, (wall + lid) / 2 + RUB_STRAW_DB, air, lid, skin
    knock_s = np.transpose(KNOCK_EVENTS)[0]
    # bumps rattle the table; knocks the rest, their tick the skin
    blows = [np.transpose(BUMP_EVENTS)[:2]] + [(knock_s, db) for db in parts_struck()]
    out = []
    for peak, (hit, db), rattle_db in zip(peaks, blows, RATTLE_DB):
        since = t - hit[:, None]
        rattle = (since > 0) * undb(db[:, None] + rattle_db - RATTLE_FADE_DB_PER_S * np.abs(since))
        out.append(np.sqrt(np.sum(undb(peak - away) ** 2, 0) + np.sum(rattle ** 2, 0)))
    return out


def place(t, level, pitch):
    """Pitch of the place rubbed: that of the loudest stroke, wandering a little; arguments are columns."""
    columns = np.transpose(STROKE_EVENTS)
    loudest = np.argmax(columns[level][:, None] - strokes(t), 0)
    return uniform_filter1d(columns[pitch][loudest], size=9) * 2 ** (WANDER_OCT * walk(8)[::HOP])


def rubbing():
    """Stick-slip grit drives the modes of each part, wall and lid near the place rubbed; skin hisses on top."""
    t, coarse = np.arange(N) / SR, np.arange(0, N, HOP) / SR
    *gains, skin = [np.interp(t, coarse, g) for g in pressure(coarse)]
    gains.append(np.sqrt(gains[4] * skin) * undb(RUB_TICK_DB))
    wall_hz, lid_hz = place(coarse, level=3, pitch=7), place(coarse, level=5, pitch=8)
    pitches = None, wall_hz, None, None, lid_hz, None
    catch_db = 1.1 * walk(45)  # the sliding hand catches and lets go
    out = colour(grit(4000, 0.65), SKIN_SPECTRUM) * skin * undb(catch_db / 2)
    parts = TABLE_MODES, WALL_MODES, STRAW_MODES, AIR_MODES, LID_MODES, TICK_MODES[:3]
    for part, (modes, broad, pitch) in enumerate(zip(parts, RUB_BROAD, pitches)):
        slip = grit(3000, 1.8) * undb(catch_db + 0.8 * walk(30))
        body = 0
        for hz, db, t60 in modes:
            octaves_off = 0 if pitch is None else np.abs(np.log2(hz / pitch))
            gain_db = db - RUB_FOCUS_DB_PER_OCT[part] * octaves_off + 0 * coarse
            gain = np.repeat(undb(gain_db), HOP)[:N]
            # the sliding hand limits how long a mode rings
            body = body + gain * resonate(slip, hz, min(RUB_LINGER[part] * t60, RUB_T60_MAX_S[part]))
        bare = band(slip, part) if part < 5 else resonate(slip, 4400, 0.0044)
        if part == 4:  # the loose lid rings more freely
            broad = broad * np.where(t < SEATED_S, LOOSE_BROAD, SEATED_BROAD)
        out += unit(band(unit(body) + broad * unit(bare), part)) * gains[part]
    return out


def bumps():
    """Soft blows that only the table top answers; the push takes a few ms."""
    out = np.zeros(N)
    for (s, db, hz), luck in zip(BUMP_EVENTS, rng.standard_normal((len(BUMP_EVENTS), 10))):
        damping = BUMP_DAMPING * undb(max(db - BUMP_PRESS_DB, 0))
        y = ring(TABLE_MODES, damping, luck, hz, scatter_db=0.5, detune=0.015, focus_db=17.5)
        push = np.minimum(np.arange(len(y)) / SR / BUMP_RISE_S, 1)
        add(out, s, undb(db) * y * push)
    return out


@njit
def walls(x, lags, gain, damp):
    """Room echo: eight delay lines that feed each other, duller on every round."""
    line, soft, out = np.zeros((8, 4096)), np.zeros(8), np.zeros((2, len(x)))
    for i in range(len(x)):
        total = 0.
        for k in range(8):
            soft[k] += (1 - damp) * (gain[k] * line[k, (i - lags[k]) & 4095] - soft[k])
            total += soft[k]
            out[k % 2, i] += soft[k]
        for k in range(8):
            line[k, i & 4095] = x[i] + soft[k] - total / 4
    return out


def scene():
    """Tumbler sounds in the centre with room echo; the two capsules hear the treble differently."""
    near = knocks() + bumps() + rubbing()
    lags = rng.integers(500, 2400, 8)  # samples
    echo = walls(near + 1e-18, lags, undb(-60 * lags / SR / ROOM_T60_S), ROOM_DAMP).mean(0)
    rumble_cut = signal.butter(4, 62, "high", fs=SR, output="sos")
    mid = signal.sosfilt(rumble_cut, near + undb(ROOM_DB) * echo) + fizz()
    # sound bends round the microphone body
    scatter = rng.standard_normal(3600) * np.exp(-np.arange(3600) / 700)
    side = shape(signal.fftconvolve(mid, scatter / np.linalg.norm(scatter))[:N], WIDTH_CURVE)
    return mid + side * np.array([[1], [-1]]) + background()


def record(dry):
    """The capsules colour the treble; peaks past full scale clip; a steep low-pass cuts the top."""
    heard = np.clip(shape(dry, MIC_CURVE), -1, 1)
    return signal.sosfilt(signal.ellip(10, .2, 90, TOP_HZ, fs=SR, output="sos"), heard)


dry = scene()
out = record(dry)
transcribe(out)
```